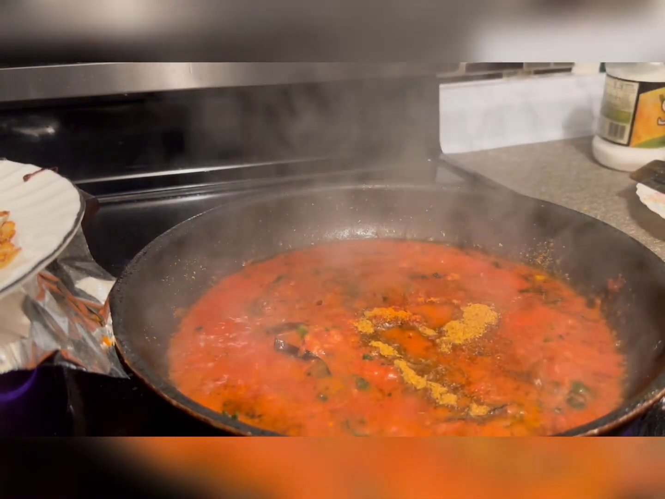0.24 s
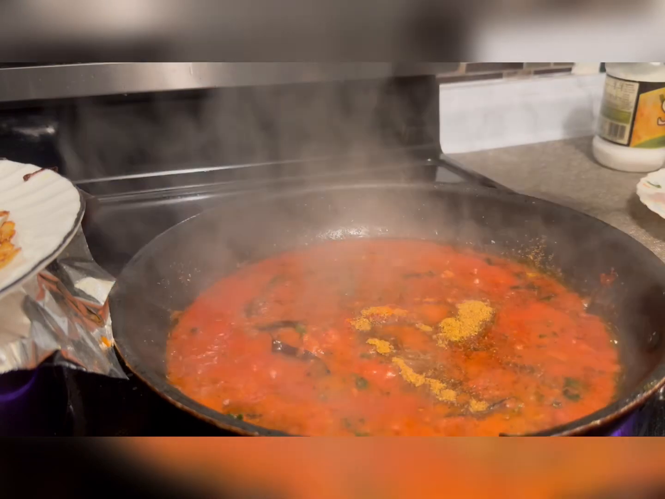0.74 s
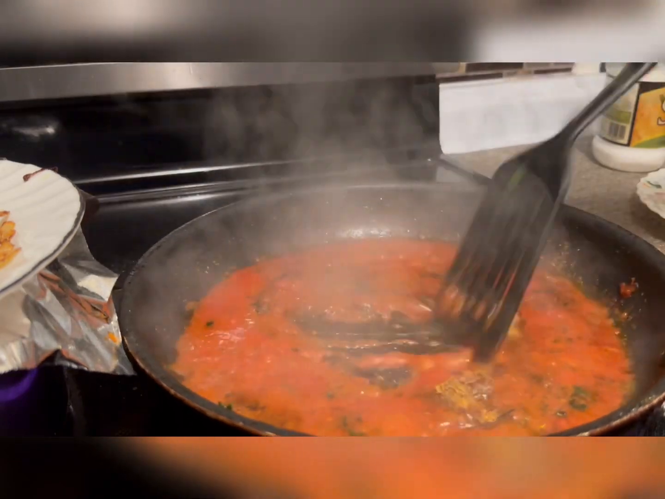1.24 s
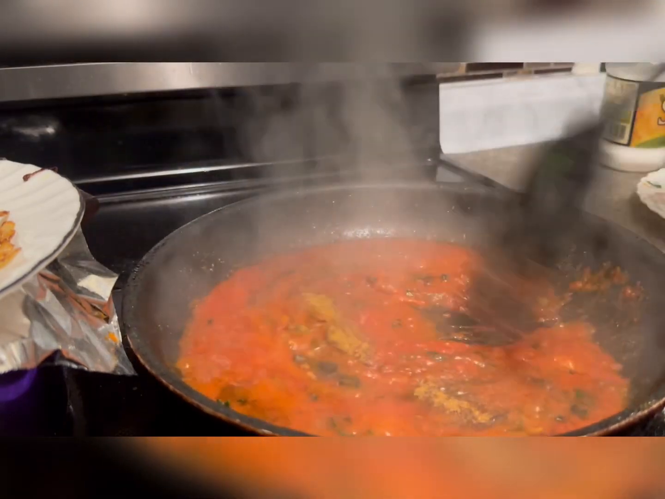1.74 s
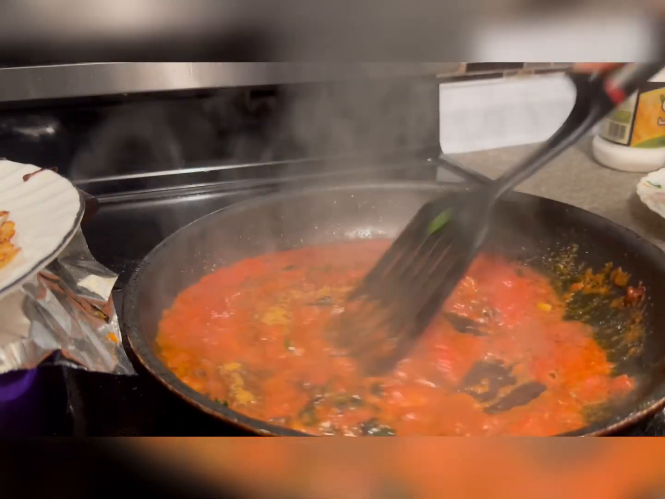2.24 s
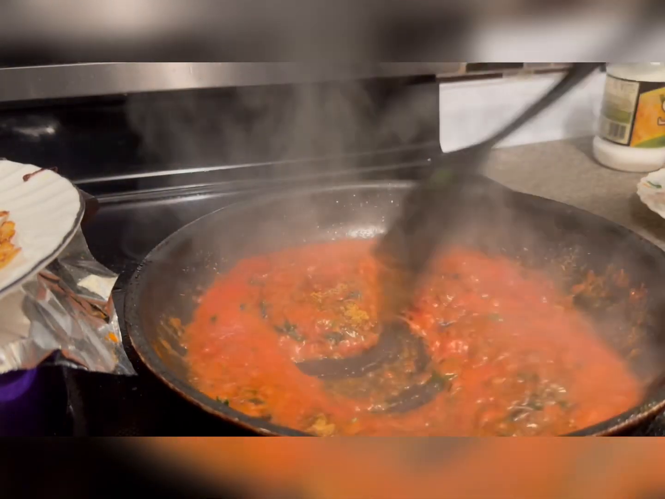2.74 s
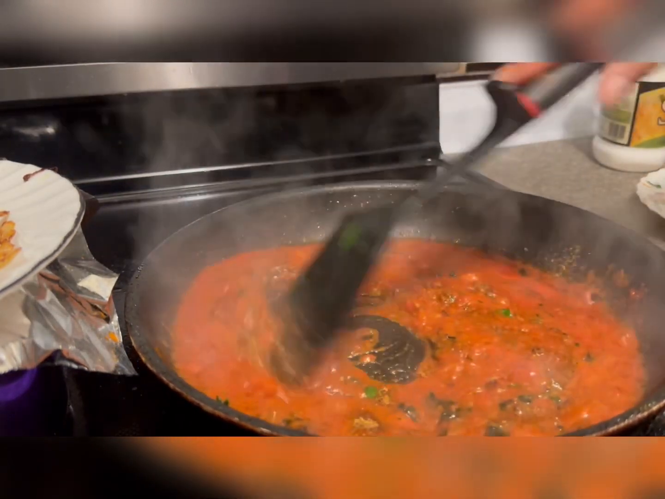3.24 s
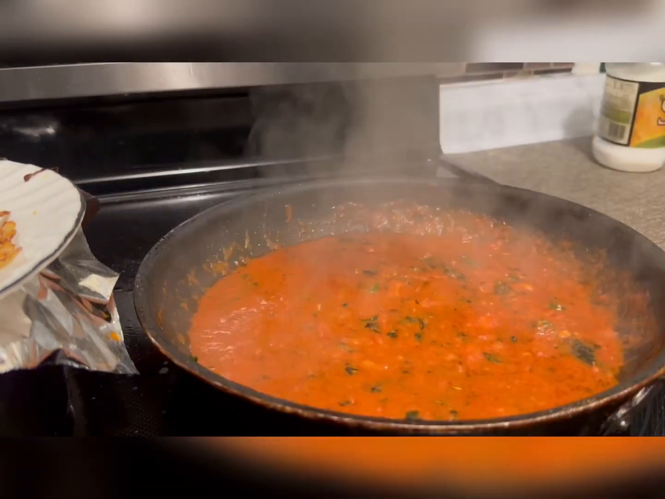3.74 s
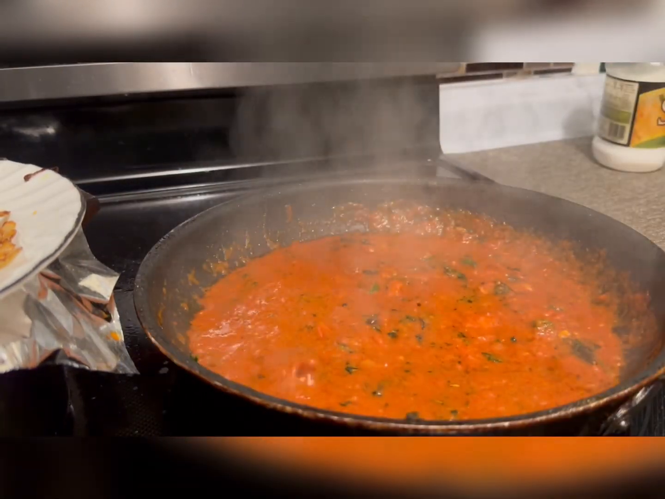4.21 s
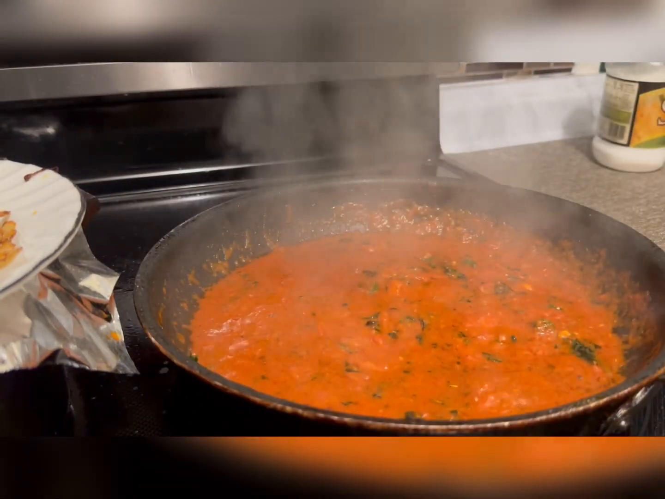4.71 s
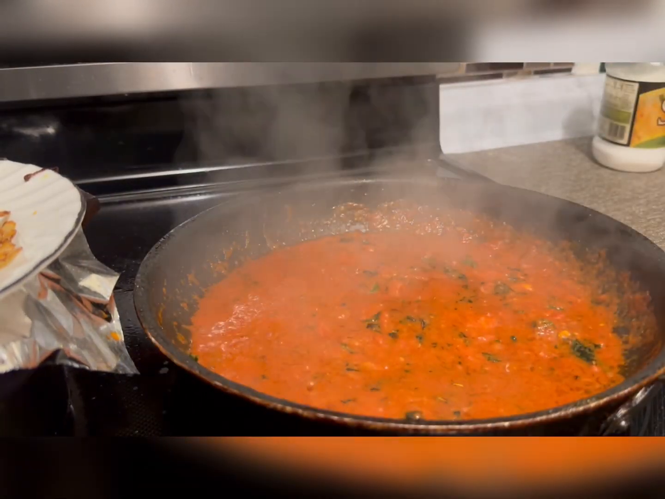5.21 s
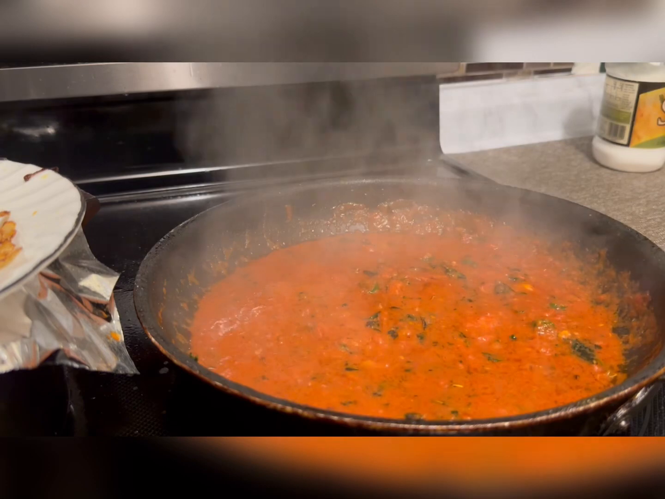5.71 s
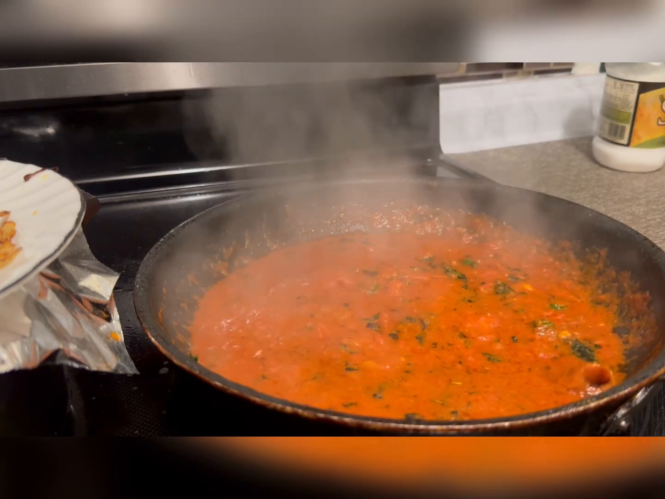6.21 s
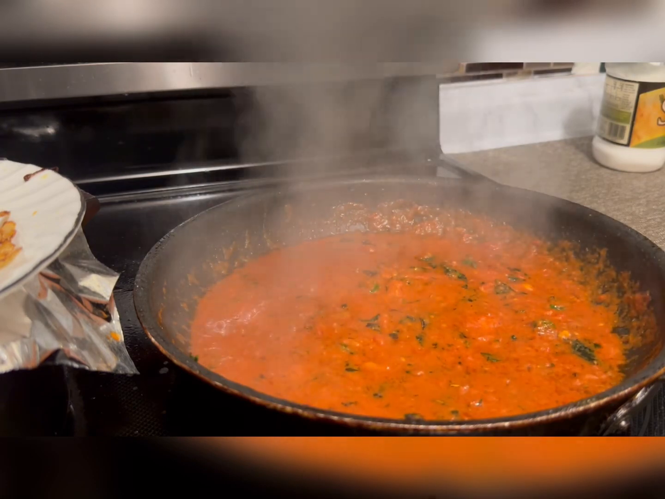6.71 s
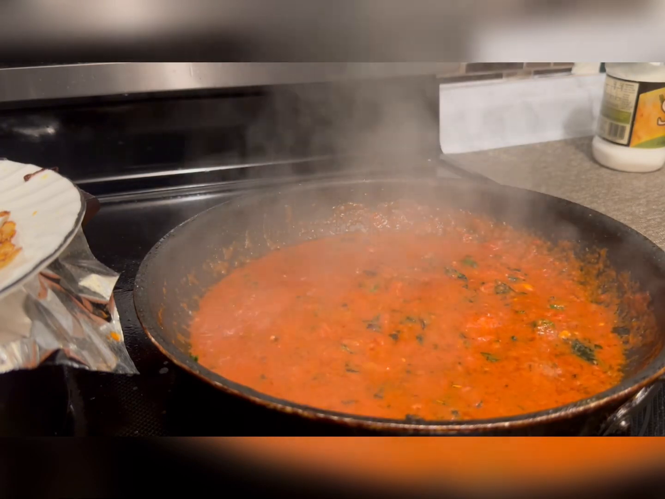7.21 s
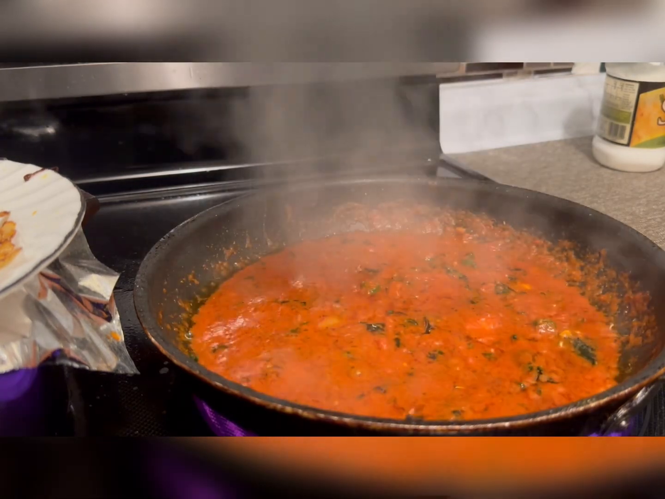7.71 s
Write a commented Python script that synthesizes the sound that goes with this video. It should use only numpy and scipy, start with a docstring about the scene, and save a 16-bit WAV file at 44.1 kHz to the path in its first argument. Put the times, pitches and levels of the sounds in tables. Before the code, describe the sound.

Close, wide stereo simmering of thick sauce in a frying pan, dry and band-limited, over faint low kitchen rumble. From 0 to 3.67 s a steady grainy hiss with soft bubbling carries tiny spits, dull double bumps near 0.3 s and another at 0.7 s. A clear metallic tap lands at 1.0 s, then a cluster of small knocks, clicks and short rasping scrapes between 1.2 and 1.9 s, with fainter scrapes near 2.8 and 3.1 s. Bright sizzle flares and recedes with the strokes, strongest around 1.2-1.7, 2.0-2.4 and 3.0-3.5 s. At 3.67 s a cut leaves a calmer, slightly quieter, even simmer, with sparse spits near 3.8, 5.1 and 5.5 s. A low motor hum swells subtly around 6.7 s. From 7.6 s a far louder, full boiling hiss rises within a third of a second and holds, growing slightly, to the end.

```python
"""A thick sauce simmers in a frying pan close to two microphone ports, in three passages joined by cuts.
First a spatula knocks, scrapes and stirs: damped modes ring, gliding resonances rasp, bared metal sizzles.
From 3.67 s a calm simmer of shaped noise and rising bubble tones goes on; a motor hum swells once near 6.7 s.
From 7.6 s a much louder simmer fades in. Bursting droplets spit in the first two passages.
A noise rumble of the kitchen lies under all; above 7950 Hz the left port lags the right."""
import sys
import numpy as np
from scipy import signal
from scipy.fft import rfft, irfft, next_fast_len
from scipy.io import wavfile
from scipy.ndimage import uniform_filter1d, map_coordinates

SR = 44100
rng = np.random.default_rng(int(sys.argv[2]) if len(sys.argv) > 2 else 0)


def generate_wav(signal):
    """Clip the signal to [-1, 1] and save it as 16-bit WAV at the path in sys.argv[1]."""
    frames = np.transpose(np.atleast_2d(signal))
    scaled = np.clip(frames, -1, 1) * 32767
    pcm = np.round(scaled).astype(np.int16)
    wavfile.write(sys.argv[1], SR, pcm)


N = 350595  # samples

# Spectra of the noise layers. Each row: frequency in Hz, relative level in dB per Hz.
KITCHEN_SPECTRUM = [(12, -40), (20, -21), (49, -2), (76, -2.5), (97, -2.5), (173, -7), (225, -8.5),
                    (268, -8.5), (400, -6.5), (520, -23), (880, -120)]
HUM_SPECTRUM = [(40, -30), (48, -1), (55, -6), (61, -15), (75, -26.5)]  # fuzzy motor hum
BOIL_SPECTRUM = [(150, -36), (250, -15.5), (416, -11.5), (473, -2.5), (625, 1.5), (723, -1), (850, -6),
                 (950, -8), (1240, -36), (2090, -120)]  # the deep boil
FROTH_SPECTRUM = [(530, -36), (900, -1), (1090, -1), (1180, -1), (1340, -1.5), (2200, -2), (2860, -39),
                  (4840, -120)]  # froth breaking on the surface
STEAM_SPECTRUM = [(1260, -24), (2150, -6.5), (2530, 1), (3080, -0.5), (3840, -5.5), (6000, -21),
                  (7800, -62), (13200, -120)]  # steam ringing in the pan's bowl
SIZZLE_SPECTRUM = [(2500, -40), (4000, -4), (5500, 0), (7000, -2), (8300, -2), (9000, -5), (10000, -2),
                   (11000, 0), (12000, -2), (14000, -2), (15800, -3.5)]
# Narrow resonances of pan and hob. Each row: centre in Hz, width in Hz, lift in dB.
BOWL_RESONANCES = [(730, 65, 1.5), (1165, 53, 3.5), (1220, 12, 3), (1573, 46, 4), (1950, 54, 2.5),
                   (2617, 105, 3), (2884, 100, 4), (3220, 39, 4.5), (4290, 53, 5.5), (4610, 70, 6.5)]
# The passages. Each row: start in seconds, fade in seconds, level the fade starts from in dB,
# then the levels of boil, froth, steam, sizzle and rumble in dB, and the sinking in dB per second.
PASSAGES = [(0, 0.0091, 1, -38.5, -38.8, -34, -36, -46.5, 0.9),
            (3.666, .03, -16, -41, -41.5, -37, -36, -47, 0.05),
            (7.602, 0.34, -32, -21.5, -20.5, -16.5, -16, -33, -1)]
# Share of the sinking, as the sauce thickens, in boil, froth, steam, sizzle and rumble.
SINK_SHARES = [1, 0.28, 0.26, 0.45, 0.6]
# Stirring works the sauce up and spreads it thin. Each row: time in seconds, vigour in dB.
STIRRING_VIGOUR = [(0, 0), (1.02, 0.5), (1.3, -0.5), (1.55, 2), (1.7, -0.5), (2.05, 2), (2.6, 1.1),
                   (2.95, -1), (3.6, -2), (3.666, -1.5)]
# Strokes that bare hot metal. Each row: start in seconds, time it stays bare in seconds, flare in dB.
BARED_METAL = [(.22, 0.045, 1.5), (.48, .04, 2.5), (.84, 0.032, 4.3), (1.17, .4, 8.2), (1.75, 0.19, 5),
               (1.95, 0.17, 7.5), (2.3, .1, 6.5), (2.56, 0.38, 4.5), (3.02, 0.045, 7.5), (3.36, 0.16, 5.5)]
# Droplets bursting. Each row: start in seconds, level in dB before a common trim, pitch in Hz.
DROPLETS = [(0.1007, -17.5, 11200), (0.347, -22, 6400), (0.4015, -27, 6610), (0.584, -21.5, 7000),
            (0.817, -20, 11700), (0.8624, -24, 11100), (1.071, -28.5, 10800), (1.4496, -21, 11300),
            (1.5365, -16, 11100), (2.6683, -22.5, 14000), (2.7182, -21.5, 11100), (3.6905, -35.5, 8190),
            (3.8397, -30, 8070), (5.1427, -22.5, 8270), (5.5014, -22, 11100)]
# Blade dragged over the pan. Each row: start and end in seconds, start and end pitch in Hz, level in dB.
SCRAPES = [(.62, .67, 1800, 1800, -40), (.8, .92, 2750, 2050, -38), (.9, 1.0, 1650, 1900, -42),
           (1.04, 1.2, 1800, 2600, -39.5), (1.17, 1.35, 2400, 2950, -41), (1.515, 1.555, 2950, 2750, -30),
           (1.5, 1.585, 1500, 1480, -37), (1.54, 1.6, 2000, 2100, -38), (1.7, 1.8, 2900, 3100, -39),
           (1.86, 1.91, 1450, 1500, -39), (2.79, 2.83, 2070, 2070, -37), (3.05, 3.15, 2600, 2900, -40)]
# Pan bumps. Each row: start in seconds, level in dB before the push's trim, push pitch in Hz,
# slap relative to that level in dB.
BUMPS = [(.274, -34.5, 85, -6), (.309, -35.5, 92, -6), (.719, -30, 145, 6), (1.45, -31, 138, -4),
         (1.491, -32, 125, -6), (1.524, -36, 95, -6), (1.809, -32, 125, -6)]
# Spatula on metal. Each row: start in seconds, level in dB before a common trim.
METAL_TAPS = [(0.6394, -24), (1.0206, -11), (1.1857, -21), (1.2794, -20), (1.4494, -19), (1.5269, -27),
              (1.5544, -16), (1.5844, -25), (1.6292, -22), (1.6544, -20), (1.8662, -25.5), (1.8844, -22)]
# Modes of the tapped pan. Each row: frequency in Hz, mean relative level in dB.
PAN_MODES = [(614, -4.5), (1170, -19), (2080, -4), (3122, 2.5), (4727, -12)]
# Between the ports. Each row: frequency in Hz, share of direct sound from 0 to 1,
# phase by which left leads in radians (before the treble lag), left minus right in dB.
PORT_DIFFERENCES = [(60, .98, 0, .5), (140, .95, 0, .3), (230, .88, 0, 1), (500, .88, .1, 1),
                    (1100, .6, .3, 2.5), (1600, .7, -.1, 1), (2800, .73, .75, -1), (3600, .47, 1, 2),
                    (4600, .55, .65, 1.5), (5200, .1, .5, 2.5), (6200, .38, .1, 3), (7100, .1, -.5, 3.5),
                    (7600, .9, .2, .5), (8000, 1, 0, 0)]

BOIL_FOLLOWS, FROTH_FOLLOWS, STEAM_FOLLOWS = .4, 1.13, .78  # dB for each dB of vigour
OPEN_S, CLOSE_S = .043, .24  # rise of a flare, time constant of the sauce flowing back
STEAM_FLARES = .16  # share of the flare heard in the steam
SWELL_S, SWELL_WIDTH_S, SWELL_DB = 6.74, .27, 7.5  # hum swell: middle, half width at 1/e of the lift, lift
IN_STEP_HZ, LAG_S = 7950, 1 / 3110  # above this frequency the left port lags by LAG_S
TOP_HZ = 15750  # band limit


def amp(db):
    """A level in dB is 20 times the base-ten logarithm of the amplitude."""
    return 10 ** (np.asarray(db) / 20)


def unit(x):
    """Root-mean-square normalization scales a sound to rms 1."""
    return x / np.sqrt(np.mean(x ** 2) + 1e-20)


def along(points, hz):
    """Interpolation on a logarithmic frequency axis gives each column after the frequency."""
    f, *columns = np.transpose(points)
    return [np.interp(np.log(hz + 1), np.log(f + 1), c) for c in columns]


def curves(rows):
    """Linear interpolation in time gives each column after the time, per sample."""
    s, *columns = np.transpose(rows)
    return [np.interp(np.arange(N) / SR, s, c) for c in columns]


def wobble(rate):
    """Spline interpolation of random knots, rate a second, gives a smooth fluctuation."""
    knots = rng.standard_normal(int(N * rate / SR) + 4)
    return map_coordinates(knots, [np.arange(N) * rate / SR])


def filtered(x, response):
    """Linear filtering multiplies the spectrum by a complex frequency response."""
    m = next_fast_len(N + 8192)
    return irfft(rfft(x, m) * response(np.fft.rfftfreq(m, 1 / SR)), m)[..., :N]


def rush(spectrum, patchy_db, grainy_db):
    """Modulated noise: four noises, together rms 1, share patches of gain and a fast crackle."""
    z = signal.stft(rng.standard_normal((4, N)), nperseg=512)[2]
    field = rng.standard_normal(z.shape[1:])
    field = uniform_filter1d(field, size=12, axis=0)  # smooth over frequency
    field = uniform_filter1d(field, size=8, axis=1)  # smooth over time
    patchy = signal.istft(z * amp(patchy_db * unit(field)), nperseg=512)[1][:, :N]
    grainy = patchy * amp(grainy_db * wobble(300))
    return unit(filtered(grainy, lambda hz: amp(along(spectrum, hz)[0])))


def bubbles(count, hz, spread, cycles, size_db):
    """Bubble resonance: damped sines at random moments rise in pitch as bubbles open; rms 1."""
    at, pitch = rng.random(count), rng.standard_normal(count)
    size = np.clip(rng.normal(size=count), -2, 2)
    f = (hz * np.exp(spread * pitch))[:, None]
    t = np.arange(700) / SR
    u = t * f / cycles
    envelope = amp(size_db * size)[:, None] * u * np.exp(-3 * u)
    grain = envelope * np.sin(2 * np.pi * f * t * (1 + .095 * u))
    where = (at * N).astype(int)[:, None] + np.arange(700)
    return unit(np.bincount(where.ravel(), grain.ravel(), N + 700)[:N])


def scattered(x, t60):
    """Diffuse reflection: x itself and three copies smeared by the hob, the wall and the hood."""
    t = np.arange(SR // 8) / SR
    tails = rng.standard_normal((3, len(t))) * amp(-60 * t / t60)
    tails = tails / np.linalg.norm(tails, axis=1, keepdims=True)
    return np.vstack([x, signal.fftconvolve(x[None], tails, axes=1)[:, :N]])


def add(track, s, sound):
    """Superposition lays a sound on the track at second s."""
    track[round(s * SR):][:len(sound)] += sound


def passage_levels():
    """Gains in series add in dB: level, sinking and fade of the five layers, per sample."""
    t = np.arange(N) / SR
    starts = [row[0] for row in PASSAGES]
    running = np.maximum(np.searchsorted(starts, t, "right") - 1, 0)
    start, fade_s, from_db, *levels_db, sinks_db = np.transpose(PASSAGES)[:, running]
    progress = np.sin(np.pi / 2 * np.clip((t - start) / fade_s, 0, 1))
    fade = amp(from_db) + (1 - amp(from_db)) * progress
    sunk_db = np.outer(SINK_SHARES, sinks_db * (t - start))
    return np.array(levels_db) - sunk_db + 20 * np.log10(fade)


def flare():
    """Exponential relaxation: a lift in dB opens, stays, and decays as sauce covers the metal."""
    t = np.arange(N) / SR
    lifts = []
    for s, bare_s, db in BARED_METAL:
        opening = np.clip((t - s) / OPEN_S, 0, 1)
        closing = np.exp(-np.maximum(t - s - OPEN_S - bare_s, 0) / CLOSE_S)
        lifts.append(db * opening * closing)
    return np.max(lifts, axis=0) * (t < PASSAGES[1][0])  # first passage only


def kitchen():
    """Broadband and narrowband noise add: rumble of room and hood, and a motor hum that swells."""
    t = np.arange(N) / SR
    swell_db = SWELL_DB * np.exp(-((t - SWELL_S) / SWELL_WIDTH_S) ** 2)
    room = amp(1.5) * rush(KITCHEN_SPECTRUM, patchy_db=.5, grainy_db=1.1)
    hum = amp(swell_db + 2) * rush(HUM_SPECTRUM, patchy_db=1.2, grainy_db=1.5)
    return amp(passage_levels()[-1]) * (room + hum)


def droplets():
    """Impulsive vapour release: each spit is a decaying puff of noise around its own pitch."""
    track, t = np.zeros(N + SR), np.arange(SR // 30) / SR
    for s, db, hz in DROPLETS:
        band = signal.butter(1, [hz * .7, min(hz * 1.4, 18000)], "band", fs=SR)
        puff = signal.lfilter(*band, rng.standard_normal(len(t)))
        add(track, s, amp(db - 7.5 - 60 * t / .049) * unit(puff))
    return scattered(track[:N], t60=.037)


def scrape():
    """Friction excitation: each stroke is gritty noise in one resonance gliding with the blade."""
    grit = rush([(0, 0), (100, -3), (320, -15), (1000, -45)], patchy_db=.5, grainy_db=2)
    track = np.zeros((4, N))
    for start, end, from_hz, to_hz, db in SCRAPES:
        at = np.arange(round(start * SR), round(end * SR))
        pitch = np.linspace(from_hz, to_hz, len(at))
        glide = np.cos(2 * np.pi * np.cumsum(pitch) / SR)  # carries the low grit up to the pitch
        track[:, at] += amp(db) * 2 * np.sqrt(np.hanning(len(at))) * glide * grit[:, at]
    return track


def spatula():
    """Impact excitation: bumps push the pan low with a dull slap; taps ring its damped modes."""
    track, t = np.zeros(N + SR), np.arange(SR // 8) / SR
    slap_band = signal.butter(2, [240, 720], "band", fs=SR)
    for s, db, hz, slap_db in BUMPS:
        tones = np.sin(2 * np.pi * hz * t) + .5 * np.sin(2 * np.pi * hz * .62 * t)
        push = (t / .008) ** 2 * np.exp(-t / .008) * tones  # the weight follows the slap
        add(track, s, amp(db + 4.5) * push)
        slap = unit(signal.lfilter(*slap_band, rng.standard_normal(len(t))))
        add(track, s, amp(db + slap_db - 60 * t / .16) * (1 - np.exp(-t / .002)) * slap)
    for s, db in METAL_TAPS:
        ring = sum(amp(level + rng.normal(0, 2) - 60 * t / .03) * np.sin(2 * np.pi * hz * t)
                   for hz, level in PAN_MODES)
        click = .5 * amp(-60 * t / .013) * rng.standard_normal(len(t))
        add(track, s, amp(db - 8) * (ring + click))
    return scattered(track[:N], t60=.03)


def sauce():
    """Boiling noise: steam hisses through the sauce, bubbles burst, bared metal adds sizzle."""
    boil_db, froth_db, steam_db, sizzle_db, _ = passage_levels()
    vigour_db, flare_db = curves(STIRRING_VIGOUR)[0], flare()
    boiling = wobble(9)  # slow unsteadiness shared by all layers
    deep = bubbles(count=900, hz=651, spread=.244, cycles=7.3, size_db=5)
    middle = bubbles(count=1500, hz=1490, spread=.251, cycles=12.1, size_db=4.5)
    small = bubbles(count=3000, hz=2874, spread=.18, cycles=11.2, size_db=-1)
    boil = rush(BOIL_SPECTRUM, patchy_db=.55, grainy_db=.7) + amp(-9) * scattered(deep, t60=.067)
    froth = rush(FROTH_SPECTRUM, patchy_db=1, grainy_db=.8) + amp(-10) * scattered(middle, t60=.045)
    steam = rush(STEAM_SPECTRUM, patchy_db=1.46, grainy_db=1) + amp(-12) * scattered(small, t60=.066)
    sizzle = rush(SIZZLE_SPECTRUM, patchy_db=1.1, grainy_db=1)
    body = amp(boil_db + BOIL_FOLLOWS * vigour_db) * boil
    body = body + amp(froth_db + FROTH_FOLLOWS * vigour_db) * froth
    body = body + amp(steam_db + STEAM_FOLLOWS * vigour_db + STEAM_FLARES * flare_db) * steam
    sizzle_gain = amp(sizzle_db + flare_db + .15 * boiling + .59 * wobble(10))
    return amp(.5 * boiling) * body + sizzle_gain * sizzle


def bowl(hiss):
    """Resonance: narrow peaks of pan and hob colour the hiss, their lifts adding in dB."""
    def response(hz):
        return amp(sum(db / (1 + (2 * (hz - centre) / width) ** 2)
                       for centre, width, db in BOWL_RESONANCES))
    return filtered(hiss, response)


def ports(four, loose=.94):
    """Interaural-style coherence: direct sound differs in phase, scattered sound is unlike at each port."""
    def mix(hz):
        share, leads, tilt_db = along(PORT_DIFFERENCES, hz)
        share = np.clip(share, 0, 1)
        treble = hz > IN_STEP_HZ
        slack = np.clip(loose, 0, 1) * treble
        half = (leads - 2 * np.pi * LAG_S * np.maximum(hz - IN_STEP_HZ, 0)) / 2
        half = half - .16 * np.sin(4 * half) * treble  # lingers in phase and in antiphase
        direct, wide = np.sqrt(share), np.sqrt((1 - share) / 2)
        across = 1j * direct * np.sin(half)
        mid = np.array([direct * np.cos(half), wide, 0 * hz, 0 * hz])
        # in the treble the difference follows the sum only loosely
        side = np.array([across * np.sqrt(1 - slack ** 2), 0 * hz, wide, across * slack])
        return np.array([(mid + side) * amp(tilt_db / 2), (mid - side) * amp(-tilt_db / 2)])
    return filtered(four, mix).sum(axis=1)


def scene():
    """Superposition: all sources add before they reach the two ports."""
    return ports(bowl(sauce()) + scrape() + spatula() + droplets() + kitchen())


def record(dry):
    """Band limitation: nothing passes at or above the limit."""
    return filtered(dry, lambda hz: hz < TOP_HZ)


dry = scene()
out = record(dry)
generate_wav(out)
```